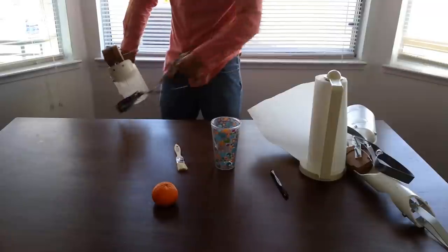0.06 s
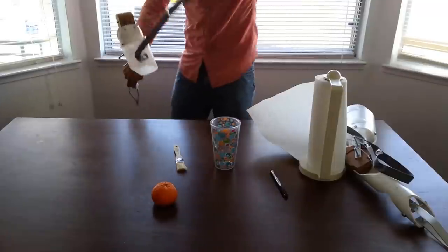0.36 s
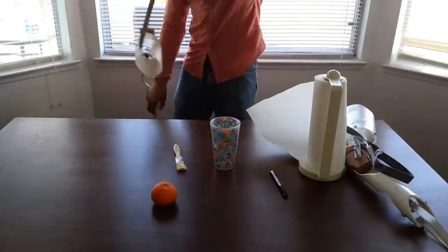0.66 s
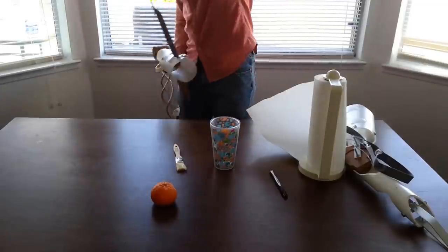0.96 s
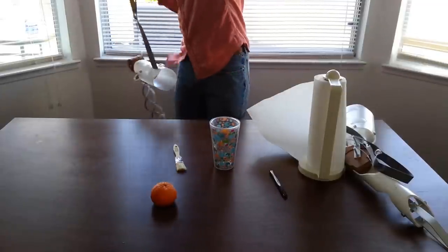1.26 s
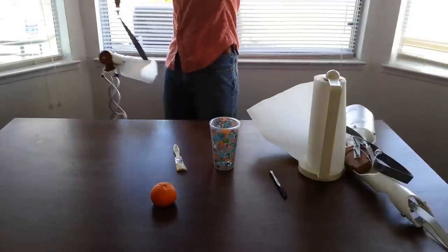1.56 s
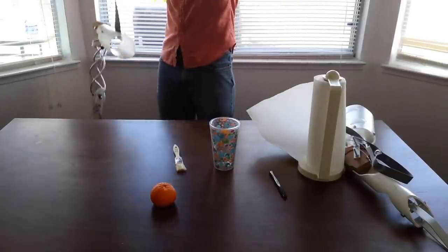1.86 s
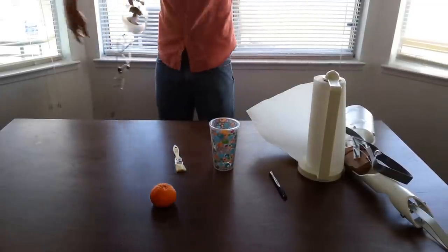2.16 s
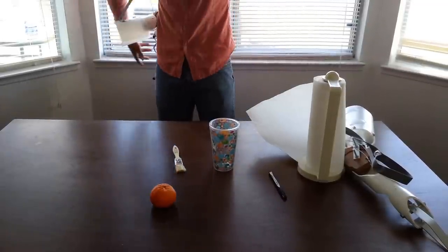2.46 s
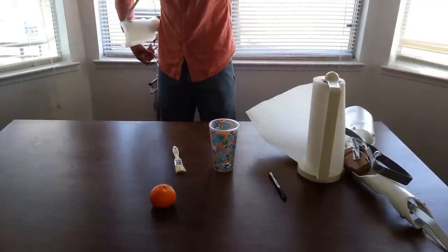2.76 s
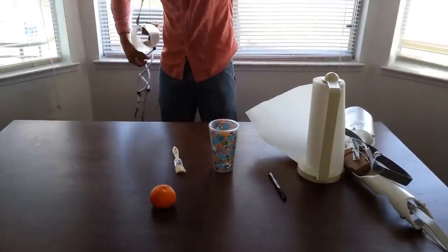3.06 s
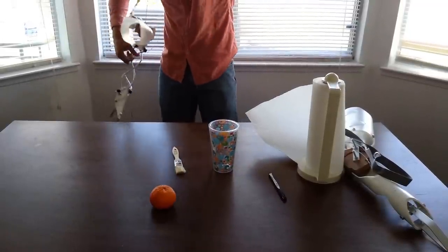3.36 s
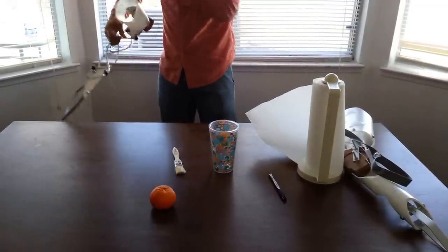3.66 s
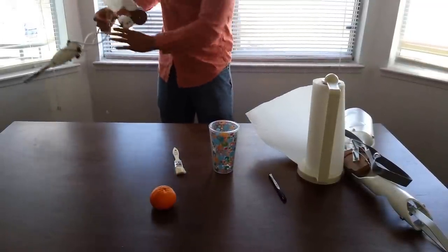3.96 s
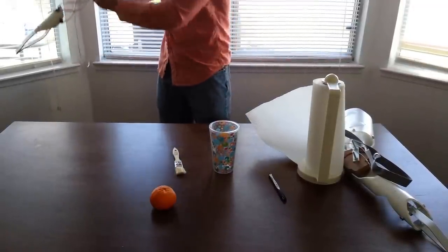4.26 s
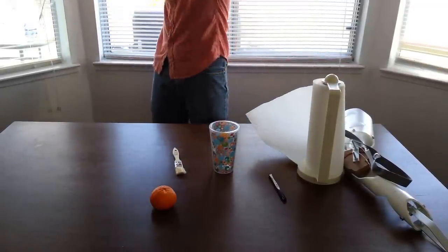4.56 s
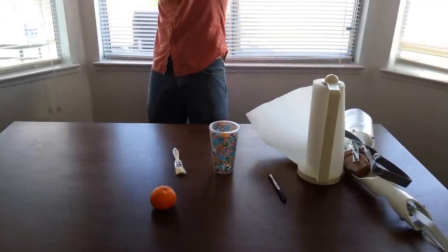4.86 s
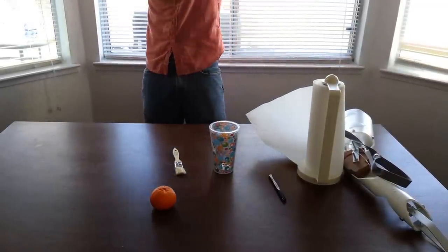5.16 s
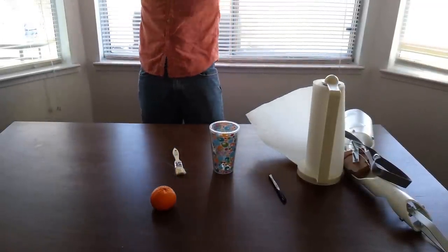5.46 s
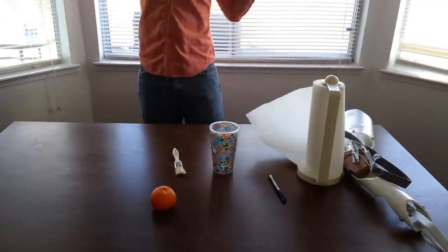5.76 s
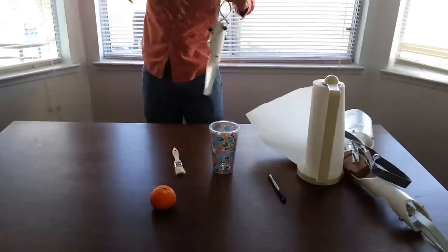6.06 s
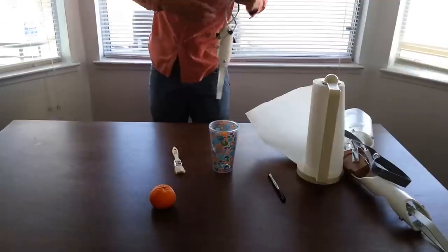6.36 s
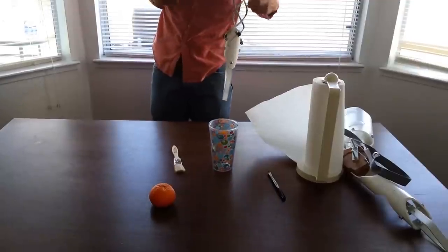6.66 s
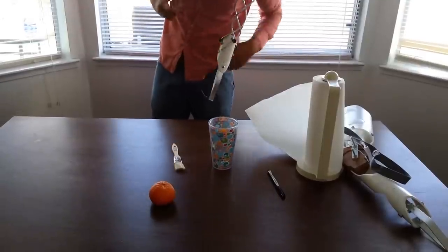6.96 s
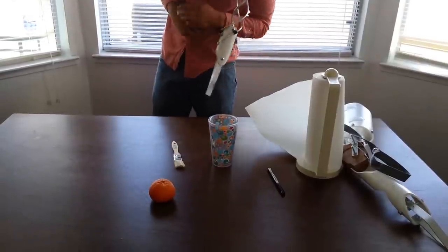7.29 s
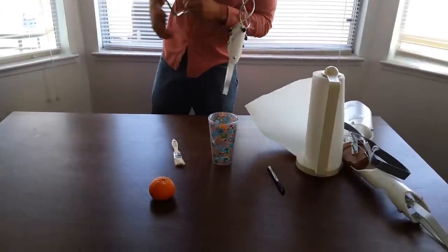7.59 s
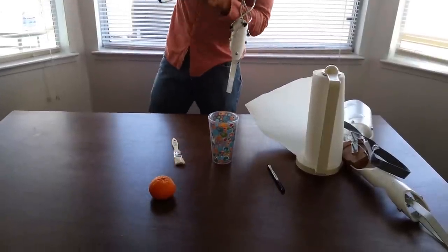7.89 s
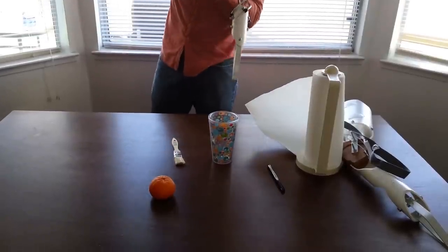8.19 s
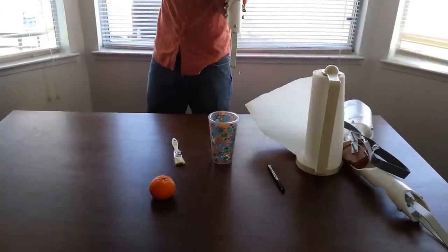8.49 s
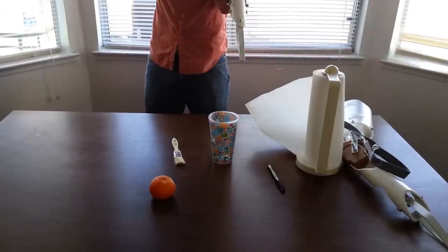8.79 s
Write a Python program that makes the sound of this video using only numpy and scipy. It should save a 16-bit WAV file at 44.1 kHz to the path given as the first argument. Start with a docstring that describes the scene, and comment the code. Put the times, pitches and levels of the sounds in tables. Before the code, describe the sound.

In a quiet, slightly echoing dining room, someone puts on a plastic arm device. Soft cloth swishes, strap snags and small taps come first. Then a sudden, sharp knock of hard parts overloads the stereo microphones, bouncing and leaving a brief ring. Afterward a woven strap slides over a shirt and is tugged, the socket is tapped, a buckle gives a few crisp clicks, and the device bumps dully against the body.

```python
"""A homemade prosthetic arm is lifted and strapped on in a bare, quiet dining room.
From the start, straps and sleeve rustle and cables tap the plastic socket. Soon the arm bumps softly on
the body, straps snag and cable ends tick. At 3.7 s its hard parts slam together, overloading the
microphones, and ringing tones linger. Near 5.5 s the harness is pulled tight; from 6.4 s a buckle clicks
and the hollow cuff is nudged. Two last soft bumps follow just after 8 s."""
import sys
import numpy as np
from scipy import signal
from scipy.fft import rfft, irfft
from scipy.io import wavfile

SR = 44100
rng = np.random.default_rng(int(sys.argv[2]) if len(sys.argv) > 2 else 0)


def master_out(mix):
    """Clip the mix to full scale and print it as 16-bit PCM to the path in sys.argv[1]."""
    frames = np.transpose(np.atleast_2d(mix))
    ceiling = np.clip(frames, -1, 1)
    pcm = np.round(ceiling * 32767).astype(np.int16)
    wavfile.write(sys.argv[1], SR, pcm)


N = 393768


def gain_of(db):
    """Turns decibels into a number to multiply a sound by."""
    return 10 ** (np.asarray(db) / 20)


def evened(x):
    """Scales a signal so that its average strength (rms) is 1."""
    return x / np.sqrt(np.mean(x ** 2) + 1e-20)


def look_up(points, hz):
    """Reads between the rows of a table, spacing frequencies by octaves."""
    f, value = np.transpose(points)
    return np.interp(np.log(hz + 1), np.log(f + 1), value)


def bins(size):
    """The frequencies in the spectrum of a sound this many samples long."""
    return np.fft.rfftfreq(size, 1 / SR)


def add(mix, start_s, sound):
    """Mixes a sound in at the given time."""
    part = mix[round(start_s * SR):][:len(sound)]
    part += sound[:len(part)]


def coloured(x, colour):
    """Gives a sound a tone colour (its balance of low and high), at strength 1."""
    return evened(irfft(rfft(x) * gain_of(look_up(colour, bins(N))), N))


def drift(per_s):
    """Smooth random wandering, at strength 1."""
    return evened(irfft(rfft(rng.standard_normal(N)) * np.exp(-(bins(N) / per_s) ** 2), N))


def resonances(modes, hz):
    """How strongly an object answers at each frequency, given the notes it briefly rings at."""
    return np.sqrt(sum(gain_of(2 * db) / (1 + ((hz ** 2 - f ** 2) / (width * hz + 1e-6)) ** 2)
                       for f, width, db in modes))


def sharpest_click(gain):
    """The most sudden click that has this gain at each frequency."""
    log_gain = np.log(np.maximum(gain, 1e-5))
    mirrored = np.concatenate([log_gain, log_gain[-2:0:-1]])
    return np.fft.ifft(np.exp(np.conj(signal.hilbert(mirrored)))).real[:len(gain)]


BLOW_HZ = bins(4096)
def blows(rows, body_gain, chatter_db):
    """Each blow is a push, then a brief chatter of the touching faces; a low cutoff makes it dull."""
    out, t = np.zeros(N), np.arange(len(BLOW_HZ)) / SR
    for start_s, db, cutoff_hz, chatter_s in rows:
        force = rng.standard_normal(len(t)) * np.sqrt(t) * np.exp(-t / chatter_s)
        force *= gain_of(chatter_db) / np.linalg.norm(force)
        force[0] = 1  # the push
        # dividing by this lets chatter lengthen the blow while hardly colouring it
        ripple = evened(abs(rfft(force, 2 * (len(t) - 1)))) + 0.75
        response = sharpest_click(body_gain / ripple / (1 + (BLOW_HZ / cutoff_hz) ** 2))
        add(out, start_s, gain_of(db) * evened(signal.fftconvolve(force, response)[:len(t)]))
    return out


# how alike left and right are: f/Hz, likeness (1 = the same, 0 = unrelated)
LIKENESS = [(60, 0.52), (130, 0.58), (290, 0.82), (640, 0.63), (1300, -0.096), (3000, -0.045),
            (15000, 0.11)]
def paired(x):
    """Makes two unrelated signals alike in the bass, as two close microphones hear them."""
    size = x.shape[1]
    left, other = rfft(x)
    same = np.clip(look_up(LIKENESS, bins(size)), -1, 1)
    right = same * left + np.sqrt(1 - same ** 2) * other
    return irfft(np.array([left, right]), size)


# tone colour of the room's still air: f/Hz, level/dB
AIR_COLOUR = [(15, -69.5), (25, -49), (194, -4.5), (297, -6.5), (368, -2.5), (420, -4), (493, -8),
              (735, -9.5), (818, -10.5), (1320, -15.5), (1470, -9.5), (1680, -18.5), (2370, -16),
              (2640, -19.5), (14500, -26)]
# faint, wavering low tones in the background: f/Hz, level/dB
LOW_TONES = [(104, -79), (220.7, -67), (332, -73.5)]
def room_air():
    """Steady room noise with faint, wavering low tones."""
    t, tones = np.arange(N) / SR, np.zeros(N)
    for f, db in LOW_TONES:
        tone = np.sin(2 * np.pi * f * t + 0.66 * drift(per_s=3.3))
        tones += gain_of(db) * tone * (1 + 0.4 * drift(per_s=4.6))
    hiss = coloured(paired(rng.standard_normal((2, N))), AIR_COLOUR)
    return gain_of(-56.5) * hiss + tones


def stroke(start_s, length_s, rise_s, fade_s, arch_db=2):
    """Strength of one sliding movement: it gathers speed, is fastest midway and dies away."""
    t = np.arange(N) / SR - start_s
    arch = gain_of(arch_db * (np.sin(np.pi * np.clip(t / length_s, 0, 1)) - 1))
    return np.clip(t / rise_s, 0, 1) * arch * np.exp(-np.maximum(t - length_s, 0) / fade_s)


# arm movements that slide the cloth: t/s, length/s, level/dB, scrape compared with swish/dB
ARM_MOVES = [(-.1, 0.12, -46.5, -5.5), (.08, 0.33, -53.5, -6.5), (0.459, 0.41, -51, -4),
             (0.844, 0.26, -48, -1), (1.04, .15, -44.5, -4.5), (1.381, 0.46, -45.5, -3),
             (1.929, 0.18, -48, -1.5), (2.246, 0.36, -47.5, -6), (3.088, .15, -56.5, -6),
             (3.38, .89, -57, -1.5), (4.64, 0.25, -55.5, -2), (5.301, 1, -52.5, -5), (6.504, 0.31, -58, 3),
             (7.0, 0.4, -58.5, -5), (7.841, .16, -65, -3.5)]
def sliding():
    """How strongly the cloth swishes and scrapes over time; the strongest movement leads."""
    swish, scrape = gain_of(-71), gain_of(-77)  # the cloth stirs a little even at rest
    for start_s, length_s, db, scrape_db in ARM_MOVES:
        speed = gain_of(db) * stroke(start_s, length_s, rise_s=0.09, fade_s=0.1)
        swish = np.maximum(swish, speed)
        scrape = np.maximum(scrape, gain_of(scrape_db) * speed)
    return swish, scrape


# tone colours of swishing cloth and of the straps' fine rasp: f/Hz, level/dB
SWISH_COLOUR = [(50, -43.5), (110, -22), (250, -4.5), (500, -4.5), (760, -1.5), (930, 2), (1150, -4),
                (2000, -0.5), (2550, -1), (2880, -3), (3300, -3.5), (3900, -10), (6000, -20), (14000, -28)]
SCRAPE_COLOUR = [(1500, -25), (3000, -8.5), (4300, 0), (6000, -9), (8500, -10.5), (11000, -9.5),
                 (15000, -20.5)]
# notes a strap rings at: f/Hz, width/Hz, level/dB
STRAP_NOTES = [(852, 85, 0), (1540, 340, -7), (2380, 320, 0.5), (2860, 260, 3.5), (3440, 260, -0.5),
               (4970, 3100, -2), (8150, 4100, -3.5)]
def cloth_rustle(snags_per_s=300, snag_spread_db=7.5, snag_share=0.64):
    """Cloth swishes as it slides; the weave catches and lets go in tiny snags that ring the straps."""
    swishing, scraping = sliding()
    snags = (rng.random(N) < snags_per_s / SR) * rng.choice([-1, 1], N)
    snags = evened(snags * gain_of(snag_spread_db * np.minimum(rng.exponential(1, N), 3)))
    swish = gain_of(-3) * coloured(rng.standard_normal(N) + snag_share * snags, SWISH_COLOUR)
    scrape = gain_of(-6.5) * coloured(rng.standard_normal(N) + 2 * snag_share * snags, SCRAPE_COLOUR)
    ring = gain_of(-6) * evened(irfft(rfft(snags) * resonances(STRAP_NOTES, bins(N)) ** 2, N))
    uneven_grip = gain_of(2 * drift(per_s=9.5))
    return uneven_grip * (swishing * swish + scraping * (scrape + ring))


# taps on the socket: t/s, level/dB, cutoff/Hz, chatter/s
TAPS = [(.133, -50.5, 5000, .004), (.310, -58, 7000, 0.0018), (1.665, -44, 4073, 0.0032),
        (2.495, -37.5, 4500, 0.0045), (2.526, -41, 4920, 0.0035), (3.127, -47, 4020, 0.0032),
        (5.338, -53, 3970, .004), (6.0122, -29, 4530, 0.0057), (6.031, -44, 3550, 0.012),
        (6.056, -41.5, 1800, 0.0053), (6.7916, -49.5, 5980, 0.0015), (7.8776, -55.5, 4526, 0.0029),
        (7.9908, -58.5, 5000, 0.0019)]
# notes the socket rings at: f/Hz, width/Hz, level/dB
SOCKET_NOTES = [(407, 65, -12.5), (640, 130, -11), (863, 62, -1), (1280, 90, -10), (1570, 270, -5),
                (2158, 300, -4.5), (2920, 160, -5.5), (3560, 400, -6), (4030, 500, -7.5), (5130, 630, -7),
                (7660, 1100, -10)]
def socket_taps():
    """Cables and fittings tap the plastic socket, which rings briefly."""
    return blows(TAPS, resonances(SOCKET_NOTES, BLOW_HZ), chatter_db=9)


# bumps on the body: t/s, level/dB, cutoff/Hz, chatter/s
BUMPS = [(.706, -45, 730, 0.0051), (2.545, -54, 700, .008), (8.157, -43, 3500, 0.008),
         (8.188, -48.5, 3000, 0.0062)]
# tone colour of a bump: f/Hz, level/dB
BUMP_COLOUR = [(40, -60), (100, -24), (200, -17), (340, 5), (490, -2.5), (700, 4.5), (1100, -4),
               (1400, -0.5), (2200, -1.5), (4000, -10), (10000, -11.5)]
def body_bumps():
    """The device knocks against arm and hip; the soft contact sounds dull."""
    return blows(BUMPS, gain_of(look_up(BUMP_COLOUR, BLOW_HZ)), chatter_db=14)


# single, larger snags: t/s, level/dB, cutoff/Hz, chatter/s
CATCHES = [(.782, -50.5, 9000, 0.0023), (.863, -48.5, 7000, 0.0017), (1.075, -45.5, 8000, 0.005),
           (1.118, -42, 6000, 0.0043), (1.461, -48, 6370, 0.004), (1.608, -46, 4970, 0.0035),
           (2.0505, -42, 10100, 0.0066), (2.1455, -41, 5500, 0.0015), (2.4075, -45.5, 6800, 0.0038),
           (4.2758, -55.5, 7000, 0.0026), (4.7522, -48.5, 8120, 0.0087), (5.742, -44, 8250, 0.004)]
def strap_catches():
    """A strap snags and slips free, ringing at the same notes as in the rustle."""
    return blows(CATCHES, resonances(STRAP_NOTES, BLOW_HZ), chatter_db=22)


# ticks of the cable ends: t/s, level/dB, cutoff/Hz, chatter/s
TICKS = [(1.9715, -47.5, 19900, 0.0024), (4.105, -54, 14000, 0.0067), (5.481, -53.5, 9980, 0.0024),
         (7.143, -49, 9000, 0.005), (7.2954, -42, 16000, 0.00042)]
# notes a cable rings at: f/Hz, width/Hz, level/dB
CABLE_NOTES = [(1370, 2200, -0.5), (3300, 1100, 1), (4970, 1800, 2), (5560, 2000, 3), (7440, 1000, 7.5),
               (9300, 1300, 5.5), (12500, 2000, -1)]
def cable_ticks():
    """Thin cable ends strike with a light, bright tick."""
    return blows(TICKS, resonances(CABLE_NOTES, BLOW_HZ), chatter_db=-5)


# the slam and its rebounds: t/s, level/dB, cutoff/Hz, chatter/s
SLAM_HITS = [(3.6645, -6.5, 7025, 0.0015), (3.673, -20, 14000, 0.0017), (3.7300, -18, 3500, 0.0053),
             (3.7695, -23.5, 2500, 0.0024)]
# tone colour of the slam: f/Hz, level/dB
SLAM_COLOUR = [(40, -55.5), (150, -35), (240, -20), (330, -20), (388, -8), (460, -16), (700, -18.5),
               (1150, -12.5), (1450, -1), (1760, -2.5), (2050, -8), (2450, -19), (2900, -6), (3500, -19),
               (4050, -10.5), (4700, -19), (9000, -22), (13000, -30.5)]
def slam():
    """The arm's hard parts hit each other and bounce three times."""
    return blows(SLAM_HITS, gain_of(look_up(SLAM_COLOUR, BLOW_HZ)), chatter_db=6)


# ringing tones that linger after the slam: f/Hz, level/dB, time to fade by 60 dB/s
SLAM_RING_NOTES = [(392, -17.5, 0.36), (642, -30.5, 0.36), (1310, -26.5, 0.32), (1527, -21, 0.53),
                   (1630, -27, 0.52), (1709, -24, .55), (1826, -31, 0.56), (2077, -26, 0.56),
                   (2790, -30.5, 0.34), (2904, -26, 0.52), (3250, -25.5, 0.46)]
def slam_ring(rise_s=0.0053):
    """Ringing tones linger after the slam, each fading at its own pace."""
    out, t = np.zeros(N), np.arange(SR) / SR
    ring = sum(gain_of(db - 60 * t / fade_s) * np.sin(2 * np.pi * (f * t + rng.random()))
               for f, db, fade_s in SLAM_RING_NOTES)
    add(out, SLAM_HITS[0][0], ring * (1 - np.exp(-t / rise_s)))
    return out


# the harness is drawn over the shoulder, then tugged tight: t/s, length/s, level/dB, rise/s
PULLS = [(5.518, 0.26, -48.5, .11), (5.719, 0.016, -42, 0.0088)]
# tone colour of the pull: f/Hz, level/dB
PULL_COLOUR = [(60, -44), (300, -9), (900, -6), (1250, -2), (1600, 3), (2150, -1), (2950, -13), (3600, -28),
               (9000, -26)]
def harness_pull():
    """A woven strap slides over the shirt in a swelling stroke that ends in a tug."""
    speed = sum(gain_of(db) * stroke(start_s, length_s, rise_s, fade_s=0.035)
                for start_s, length_s, db, rise_s in PULLS)
    return speed * coloured(rng.standard_normal(N), PULL_COLOUR)


# clicks of the buckle: t/s, level/dB, cutoff/Hz, chatter/s
CLICKS = [(6.4294, -54, 6100, 0.0023), (6.4820, -29, 10900, 0.0006), (7.1498, -35, 7630, 0.00026)]
# notes the buckle rings at: f/Hz, width/Hz, level/dB
BUCKLE_NOTES = [(480, 480, -17), (897, 106, -3.5), (1410, 240, -10), (1785, 230, -1.5), (2124, 110, 3),
                (2330, 130, 0), (3500, 440, -0.5), (4050, 220, 4), (4590, 290, 3.5), (5370, 450, -7),
                (7300, 470, 3), (8450, 1100, -2.5), (11400, 1900, -0.5), (13700, 1200, -4)]
def buckle_clicks():
    """Short, sharp contacts make the buckle click."""
    return blows(CLICKS, resonances(BUCKLE_NOTES, BLOW_HZ), chatter_db=0.5)


# nudges to the cuff: t/s, level/dB, cutoff/Hz, chatter/s
NUDGES = [(6.812, -56.5, 2000, 0.0024), (7.880, -60, 2000, 0.0033)]
# notes the cuff rings at: f/Hz, width/Hz, level/dB
CUFF_NOTES = [(758, 29, 11), (1500, 130, -14), (2200, 67, -16)]
def cuff_nudges():
    """The hollow cuff is nudged and answers mostly with one note."""
    return blows(NUDGES, resonances(CUFF_NOTES, BLOW_HZ), chatter_db=0)


# how long the room rings: f/Hz, time to fade by 60 dB/s
ROOM_FADE = [(120, .4), (400, 0.55), (1000, 0.6), (2800, 0.6), (5500, 0.54), (9000, .48), (14000, 0.29)]
# echoes off table and walls, compared with the direct sound: t/s, level/dB
ECHOES = [(.0016, 1), (.0052, -9), (.0074, -8), (.0112, -5.5), (.0205, -9), (.0285, -6.5)]
def room(x, direct_db, build_s):
    """The direct sound, a few early echoes, and a blurred tail whose treble dies first."""
    f, t, tail = signal.stft(rng.choice([-1., 1.], (2, SR)), SR, nperseg=256)
    tail *= gain_of(-60 * t / look_up(ROOM_FADE, f)[:, None]) * (1 - np.exp(-t / build_s))
    response = paired(signal.istft(tail, SR, nperseg=256)[1])
    response /= np.linalg.norm(response, axis=1, keepdims=True)
    response[[0, 1], [2, 0]] += gain_of(direct_db)  # reaches the left side two samples later
    for delay_s, db in ECHOES:
        arrivals = np.round((delay_s + rng.uniform(0, 0.0004, 2)) * SR).astype(int)  # left, right
        response[[0, 1], arrivals] += gain_of(direct_db + db)
    return signal.fftconvolve(x[None], response / np.linalg.norm(response[0]), axes=1)[:, :N]


def moving_in_room(x, direct_db, paths=3):
    """The wearer sways, so the paths through the room keep changing."""
    sway = np.pi * 2.5 * np.arange(N) / SR
    shares = (np.sqrt(2 / paths) * np.cos(sway + np.pi * k / paths) for k in range(paths))
    return sum(room(x * share, direct_db, build_s=0.0013) for share in shares)


def panned(x, right_db):
    """Makes the right side this many dB louder than the left."""
    return x * gain_of([[-right_db / 2], [right_db / 2]])


def scene():
    """All the handling of the arm, heard in the room."""
    mix = room_air()
    mix += moving_in_room(cloth_rustle() + harness_pull(), direct_db=-12)
    mix += room(socket_taps() + body_bumps() + cuff_nudges(), direct_db=-7.5, build_s=0.0027)
    mix += room(strap_catches(), direct_db=-4, build_s=0.0011)
    mix += panned(room(cable_ticks() + buckle_clicks(), direct_db=-7, build_s=0.0035), right_db=2)
    mix += room(slam(), direct_db=-9.5, build_s=0.0015) + slam_ring()
    return mix


def record(dry, lopsided=0.1, top_hz=14800):
    """Overloaded microphones flatten peaks unevenly, adding a low thump; the highest treble is cut."""
    clipped = np.clip(dry, -1, 1)
    rumble_cut = signal.butter(1, 20, "high", fs=SR, output="sos")
    bent = signal.sosfilt(rumble_cut, clipped - lopsided * clipped ** 2)
    treble_cut = signal.firwin(511, top_hz, window=("kaiser", 9), fs=SR)
    return signal.oaconvolve(bent, treble_cut[None], "same")


dry = scene()
out = record(dry)
master_out(out)
```